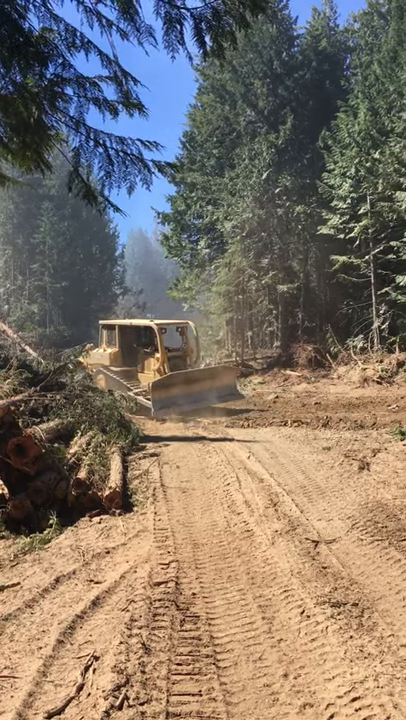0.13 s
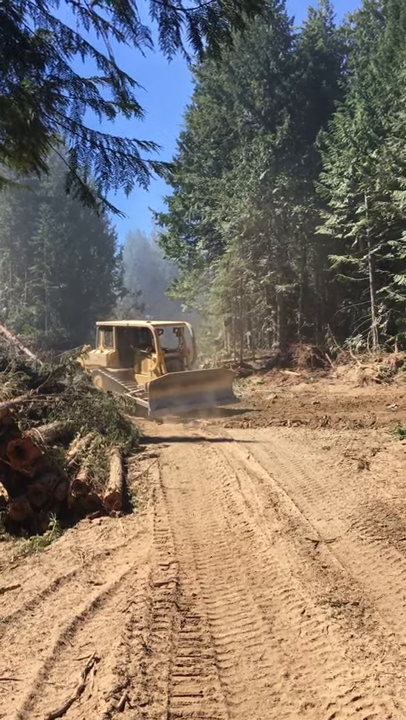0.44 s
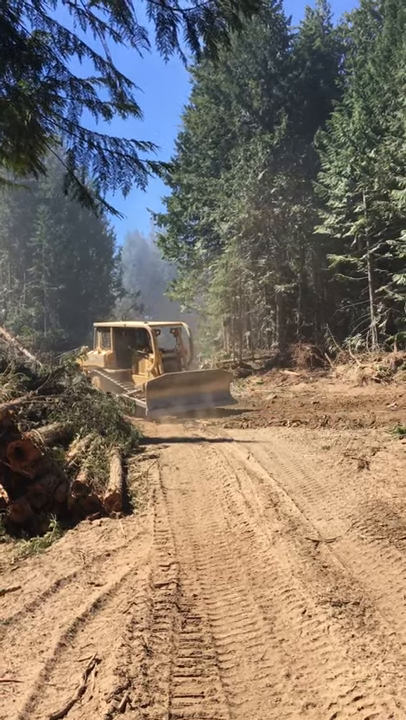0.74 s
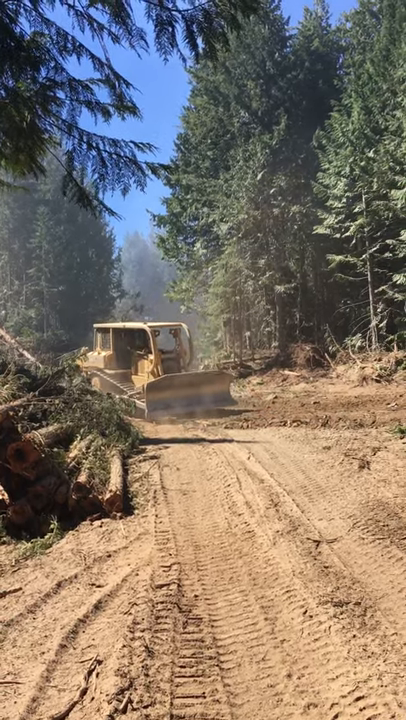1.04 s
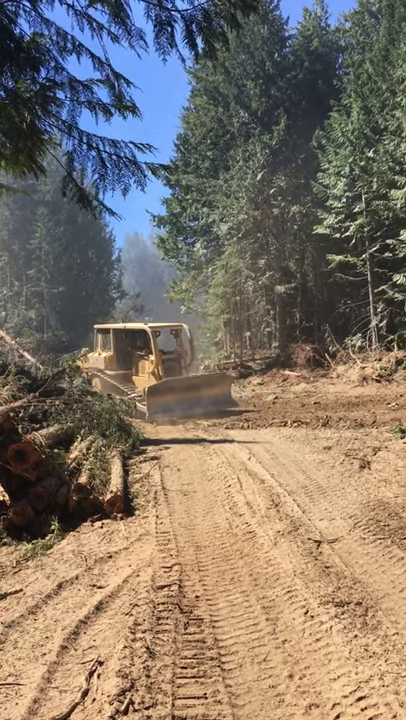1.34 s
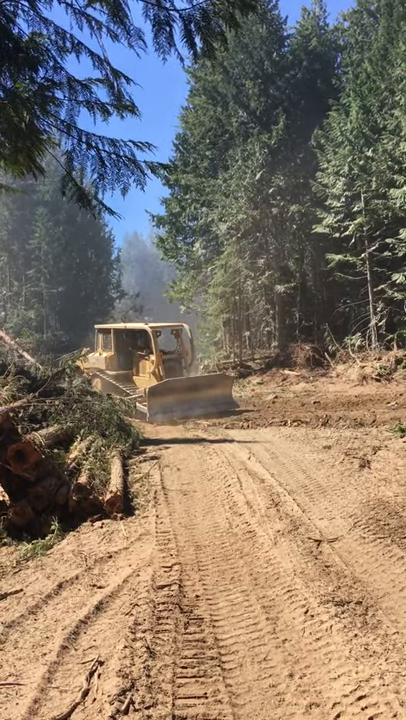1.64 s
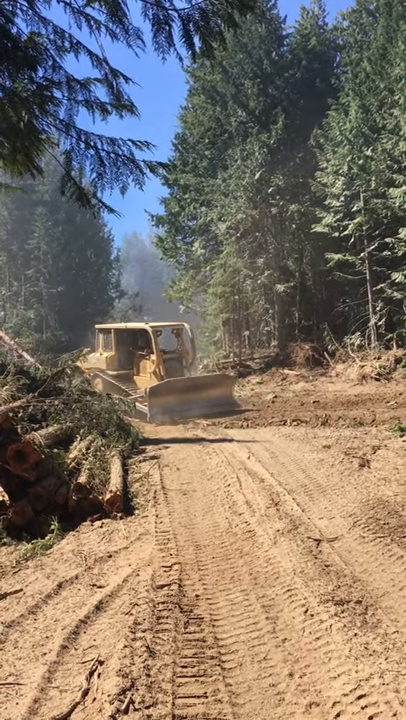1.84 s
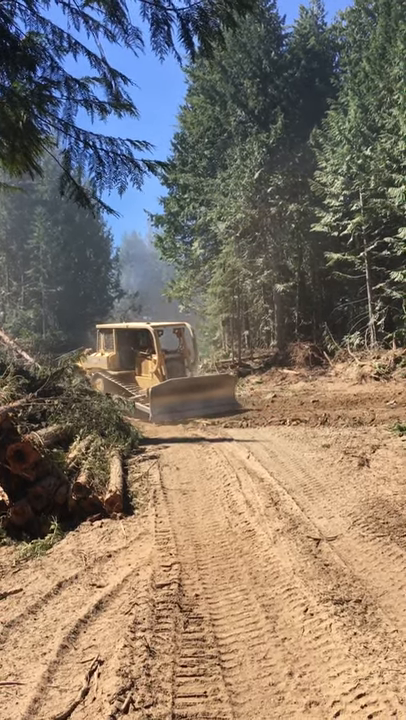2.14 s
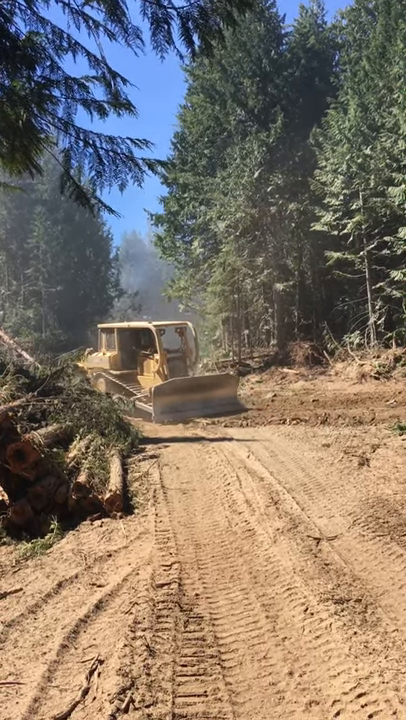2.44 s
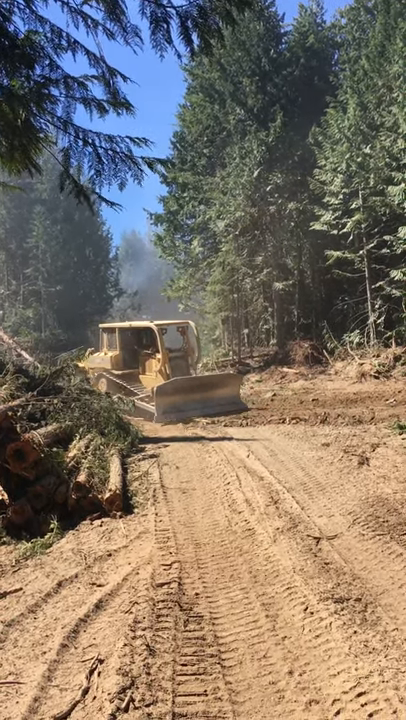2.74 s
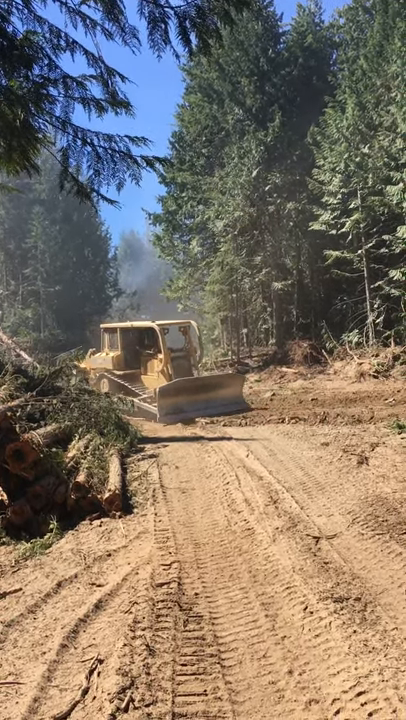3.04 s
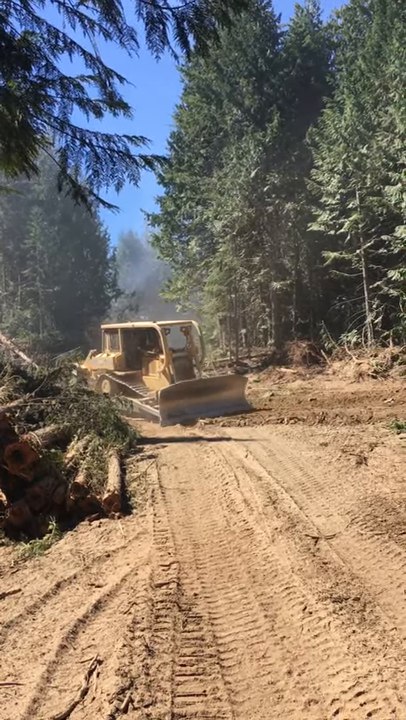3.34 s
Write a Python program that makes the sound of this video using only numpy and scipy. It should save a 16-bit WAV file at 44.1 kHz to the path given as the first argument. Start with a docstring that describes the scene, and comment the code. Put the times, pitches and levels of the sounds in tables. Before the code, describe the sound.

A bulldozer's deep diesel rumble sags in pitch, then revs steadily upward, over a second idling diesel drone. Tracks squeal and scrape mid-way, steel frame knocks follow; open forest clearing, phone microphone at some distance.

```python
"""Bulldozer on a forest track

A tracked diesel slows, then revs up: firing tones, a gas puff per firing through stack resonances, and
block clatter, as sums of sines and filtered noise. Wavering tones make turbo whistle, gear whine and pin squeals.
Tracks scrape as gated grit; steel knocks ring frame modes. Trunks echo these sharp track and frame sounds.
A second diesel idles steadily on its own multiples over booming hull resonances and a broad roar."""
import sys
import numpy as np
from scipy import signal
from scipy.fft import rfft, irfft
from scipy.io import wavfile
from scipy.ndimage import uniform_filter1d

SR = 44100
rng = np.random.default_rng(int(sys.argv[2]) if len(sys.argv) > 2 else 0)


def makeup_ratio(level_db):
    """Linear amplitude ratio for a level in decibels (20 dB per factor of ten)."""
    decades = np.asarray(level_db, float) / 20
    return 10 ** decades


def wrap_up_sound(samples):
    """Save the sound to the file named by the first command line argument, as 16-bit audio."""
    columns = np.atleast_2d(samples).T
    # keep every value between -1 and 1, then stretch to whole-number steps
    tamed = np.clip(columns, -1, 1)
    steps = np.round(tamed * 32767).astype(np.int16)
    wavfile.write(sys.argv[1], SR, steps)


N = 154350
T = np.arange(N) / SR

# dozer engine speed: time_s, firing_hz
REVS = [(0.0, 59.17), (0.21, 57.31), (0.41, 54.73), (0.62, 52.49), (0.82, 51.94), (1.03, 51.93),
        (1.23, 50.5), (1.44, 47.15), (1.65, 43.41), (1.85, 42.84), (2.06, 47.69), (2.26, 52.13),
        (2.47, 55.45), (2.68, 59.15), (2.88, 64.24), (3.09, 65.75), (3.29, 69.92), (3.5, 73.69)]
# dozer firing tone: time_s, level_db
TONE = [(0.0, -27), (0.41, -18.5), (0.82, -17.5), (1.23, -25.5), (1.65, -16.5), (2.06, -21.0), (2.47, -20),
        (2.88, -25), (3.29, -30), (3.5, -40.5)]
# dozer tone partials: firing_multiple, relative_db
DOZER_ORDERS = [(1, 0), (2, -12.5)]
# engine load: time_s, puff_db, clatter_db
BARK = [(0, -42.5, -35.5), (1.1, -49.5, -39), (1.8, -44, -36), (2.2, -35, -36), (2.45, -37, -33),
        (2.7, -43, -35.5), (3.08, -41, -33), (3.5, -43.5, -36)]
# exhaust stack resonances: centre_hz, width_hz, relative_db
STACK_MODES = [(1155, 120, 1.5), (1555, 180, 4)]
# engine block resonances: centre_hz, width_hz, relative_db
BLOCK_MODES = [(979, 146, -4), (1152, 66, -0.5), (1294, 154, -1.5), (1520, 128, -1), (1694, 77, -3.5),
               (1906, 48, -6.5), (2088, 52, -7), (2268, 40, -7.5), (2728, 29, -11.5), (3250, 380, -5)]
# turbo whistle: time_s, pitch_hz, level_db
TURBO = [(0, 7130, -51), (.25, 6850, -49), (.92, 6110, -55.5), (1.15, 5750, -66), (1.5, 5300, -52.5),
         (2.55, 5350, -48.5), (2.85, 5590, -59), (3.1, 6057, -49.5), (3.5, 6450, -60)]
# gear whine: time_s, pitch_hz, level_db
GEAR = [(2.55, 1323, -72), (2.7, 1360, -37.5), (2.95, 1450, -41), (3.15, 1520, -38), (3.33, 1535, -47),
        (3.45, 1606, -37.5)]
# track pin squeals: start_s, hold_s, pitch_hz, level_db
PIN_SQUEALS = [(0.445, .14, 8000, -55), (1.669, 0.063, 7060, -35.5), (1.666, 0.2, 3600, -41),
               (1.926, 0.066, 8331, -47.5), (2.001, 0.045, 8451, -33), (2.105, 0.037, 8480, -43),
               (2.141, 0.05, 7940, -32.5), (2.021, 0.19, 3620, -42.5), (2.311, .289, 8231, -54.5),
               (2.611, 0.073, 8251, -42), (2.601, 0.08, 11000, -49), (2.831, .19, 6361, -53),
               (2.6, .23, 6351, -54)]
# dry scrapes of steel on steel: start_s, hold_s, level_db
SCRAPES = [(1.66, 0.071, -41.5), (1.777, 0.019, -40.5), (1.805, 0.02, -33.5), (1.921, 0.015, -36.5),
           (2.001, 0.18, -35), (2.244, .015, -45.5), (2.593, 0.084, -42)]
# pin resonances in the scrapes: centre_hz, width_hz, relative_db
PIN_MODES = [(3230, 1600, 13.5), (6000, 2000, 3), (8380, 850, 9.5), (11900, 1200, 2.5), (14800, 1500, -1)]
# knocks of the steel frame: time_s, level_db, brightest_hz
KNOCKS = [(0.224, -24, 520), (2.405, -27, 1750), (2.425, -23, 1600), (3.018, -21.5, 1550),
          (3.042, -22.5, 2090), (3.055, -24, 2970), (3.07, -23.5, 1180)]
# frame modes: nominal_hz, t60_s
FRAME_MODES = [(520, 0.045), (1170, 0.063), (1570, .06), (1760, 0.046), (2090, 0.11)]
# idler tone partials: firing_multiple, level_db
IDLER_ORDERS = [(1, -25.5), (2, -22), (3, -39.5), (4, -41.5)]
# hull resonances: centre_hz, width_hz, level_db
HULL_MODES = [(72, 20.4, -25.5), (103, 22, -29), (190.1, 26.6, -34), (272.5, 34.7, -36.5), (348, 57.3, -37),
              (501, 84, -41.5), (658, 75, -44.5)]
# roar spectrum: frequency_hz, relative_density_db
ROAR_COLOUR = [(100, -8.5), (155, -29.5), (300, -13), (600, -22.5), (1500, -24), (3200, -24.5), (4300, -29),
               (6600, -35), (10000, -42), (15500, -48.5)]

DOZER_PHASE_ZERO_S = .0151
SILENCER_LAG_S = .021  # tone leaves the silencer later than the puffs
PUFF_START_CYCLES, PUFF_DECAY_CYCLES, PUFF_SCATTER_DB = 1.264, 0.23, 3.5
BLOW_DB = -1  # sharp puff front, re gas noise
TURBO_POLE_WIDTH_HZ, TURBO_PULSING = 130, .35
TURBO_FLUTTER_HZ = 260  # at the strongest puff level
GEAR_POLE_WIDTH_HZ = 30
SQUEAL_POLE_WIDTH_HZ, SQUEAL_OCTAVE_DB, SQUEAL_FLUTTER_DB = 80, -19, 2.
EDGE_S, RELEASE_S = .005, .006
SPARKLE_DB = -6.5  # thin pin modes, re grit
KNOCK_OCTAVES = .3  # modes this far from the brightest pitch lose 8.4 dB
CRUNCH_DB, CRUNCH_DECAY_S = -9, .025
TREES_T60_S, TREES_DELAY_S, TREES_DB = 0.6, .012, -17
IDLER_HZ, IDLER_PHASE_ZERO_S = 44.26, .0048
ROAR_DB, ROAR_DB_PER_HZ = -36.5, 0.2068  # level at mean firing rate; rise with firing rate
TOP_HZ = 15720


def curve(table, col=1):
    """A table column joined by straight lines in time."""
    return np.interp(T, [row[0] for row in table], [row[col] for row in table])


def unit(x):
    """Scale to rms 1."""
    return x / np.sqrt(np.mean(x ** 2))


def walk(rate_hz):
    """Random levels held 1 / rate_hz and smoothed by two moving averages."""
    hold = int(SR / rate_hz)
    steps = np.repeat(rng.standard_normal(N // hold + 1), hold)
    return 1.58 * uniform_filter1d(uniform_filter1d(steps, hold), hold)[:N]


def ring(x, modes):
    """Sum of twice-applied resonances in alternating sign, each at its own rms level."""
    out = 0
    for k, (hz, width_hz, db) in enumerate(modes):
        b, a = signal.iirpeak(hz, hz / width_hz / 1.55, SR)  # 1.55: two passes narrow the peak
        mode = signal.lfilter(b, a, signal.lfilter(b, a, x))
        out = out + (-1) ** k * makeup_ratio(db) * unit(mode)
    return out


def waver(hz, pole_width_hz, steady):
    """Tone modulated by twice-low-passed complex noise to a narrow band; steady weights the clean tone."""
    pole = np.exp(-np.pi * pole_width_hz / SR)
    z = signal.lfilter([1], np.convolve([1, -pole], [1, -pole]), rng.standard_normal((2, N)))
    blur = (z[0] + 1j * z[1]) / z.std() / 2 ** .5
    carrier = np.exp(2j * np.pi * np.cumsum(hz + 0 * T) / SR)
    return unit(np.real((steady + (1 - steady) * blur) * carrier))


def gate(start_s, hold_s):
    """Linear start, hold, exponential release."""
    release = np.exp(-np.clip(T - start_s - hold_s, 0, 1) / RELEASE_S)
    return np.clip((T - start_s) / EDGE_S, 0, 1) * release


def firing_tones(cycles, orders, wobble_db):
    """Sines at multiples of the firing rate, each wobbling in level."""
    out = 0
    for multiple, db in orders:
        level = makeup_ratio(db + wobble_db * walk(5.78))
        out = out + level * 2 ** .5 * np.sin(2 * np.pi * multiple * cycles)
    return out


def exhaust_puffs(cycle):
    """Each firing starts a decaying gas pulse and a sharp blow of the same random size."""
    size = makeup_ratio(PUFF_SCATTER_DB * rng.standard_normal(400))[np.floor(cycle).astype(int) + 2]
    puffs = unit(uniform_filter1d(size * np.exp(-(cycle % 1) / PUFF_DECAY_CYCLES), size=40))
    blows = unit(size * np.diff(np.floor(cycle), prepend=np.floor(cycle[0])))
    return puffs, blows


def stack_bark(puffs, blows):
    """Puffed gas noise and blows excite the stack resonances."""
    gas = puffs * rng.standard_normal(N)
    return makeup_ratio(curve(BARK)) * unit(ring(gas + makeup_ratio(BLOW_DB) * blows, STACK_MODES))


def block_clatter():
    """Steady noise excites the engine block resonances."""
    level = makeup_ratio(curve(BARK, col=2) + 0.45 * walk(13))
    return level * unit(ring(rng.standard_normal(N), BLOCK_MODES))


def turbo_whistle(puffs):
    """Narrow-band whistle, fluttering in pitch with load and pulsed by the puffs."""
    load = makeup_ratio(curve(BARK))
    hz = curve(TURBO) + TURBO_FLUTTER_HZ * load / load.max() * walk(400)
    level = makeup_ratio(curve(TURBO, col=2) + 2.5 * walk(10))
    return level * waver(hz, TURBO_POLE_WIDTH_HZ, 0.) * unit(1 + TURBO_PULSING * puffs)


def gear_whine():
    """Partly steady tone following the tabled gear pitch."""
    return makeup_ratio(curve(GEAR, col=2)) * waver(curve(GEAR), GEAR_POLE_WIDTH_HZ, 0.38)


def dozer():
    """Firing phase, the integral of firing rate, drives tone and puffs; clatter, turbo and gear add."""
    hz = curve(REVS)
    cycles = np.cumsum(hz) / SR - hz[0] * DOZER_PHASE_ZERO_S
    puffs, blows = exhaust_puffs(cycles + SILENCER_LAG_S * hz - PUFF_START_CYCLES)
    tone = makeup_ratio(curve(TONE)) * firing_tones(cycles, DOZER_ORDERS, 0.32)
    return tone + stack_bark(puffs, blows) + block_clatter() + turbo_whistle(puffs) + gear_whine()


def pin_squeals():
    """Pins squeal on single modes, with an octave where it fits below TOP_HZ."""
    out = 0
    for start_s, hold_s, hz, db in PIN_SQUEALS:
        steady = .75 if db > -40 else .4  # faint squeals are rougher
        tone = waver(hz, SQUEAL_POLE_WIDTH_HZ, steady)
        if 2 * hz < TOP_HZ:
            tone = tone + makeup_ratio(SQUEAL_OCTAVE_DB) * waver(2 * hz, 2 * SQUEAL_POLE_WIDTH_HZ, steady)
        out = out + makeup_ratio(db + SQUEAL_FLUTTER_DB * walk(70)) * gate(start_s, hold_s) * tone
    return out


def scrapes():
    """Gated bursts of grit through pin resonances, with thin modes flaring at random."""
    grit = unit(ring(makeup_ratio(1.8 * walk(200)) * rng.standard_normal(N), PIN_MODES))
    flares = 0
    for hz in rng.uniform(7600., 13200., size=48):
        flares = flares + makeup_ratio(6. * np.clip(walk(50), -2, 1.5)) * waver(hz, 130., 0.)
    gates = sum(makeup_ratio(db) * gate(start_s, hold_s) for start_s, hold_s, db in SCRAPES)
    return (grit + makeup_ratio(SPARKLE_DB) * unit(flares)) * gates


def knocks():
    """Each knock rings the frame modes nearest its brightest pitch and crunches briefly."""
    out = 0
    for time_s, db, brightest_hz in KNOCKS:
        t = np.clip(T - time_s, 0, 9)
        crunch = ring(rng.standard_normal(N), [(brightest_hz, 0.73 * brightest_hz, db + CRUNCH_DB)])
        out = out + (t > 0) * np.exp(-t / CRUNCH_DECAY_S) * crunch
        for hz, t60_s in FRAME_MODES:
            level_z, pitch_z = rng.standard_normal(2)
            distance = np.log2(hz / brightest_hz) / KNOCK_OCTAVES
            level = makeup_ratio(db + 1.6 * level_z - 8.4 * distance ** 2)
            envelope = makeup_ratio(-60 * t / t60_s) * (1 - np.exp(-t / 0.00084))
            out = out + level * np.sin(2 * np.pi * hz * (1 + 0.011 * pitch_z) * t) * envelope
    return out


def idler():
    """Second diesel: multiples of a constant firing rate."""
    return firing_tones(IDLER_HZ * (T - IDLER_PHASE_ZERO_S), IDLER_ORDERS, 0.94)


def hull_boom():
    """Noise-driven hull resonances, each swelling on its own."""
    return sum(makeup_ratio(1.67 * walk(4.91)) * ring(rng.standard_normal(N), [mode]) for mode in HULL_MODES)


def roar():
    """Broad fan and track noise in separately wavering octaves, louder at higher firing rate."""
    f = np.maximum(np.arange(N // 2 + 1) * SR / N, 1)
    hz, db = np.transpose(ROAR_COLOUR)
    spectrum = rfft(rng.standard_normal(N)) * makeup_ratio(np.interp(np.log(f), np.log(hz), db))
    out = 0
    for centre_hz in 125 * 2. ** np.arange(8):
        band = np.cos(np.pi / 2 * np.clip(np.log2(f / centre_hz), -1, 1)) ** 2
        out = out + makeup_ratio(0.92 * walk(9.24)) * irfft(spectrum * band, N)
    faster_hz = curve(REVS) - np.mean(curve(REVS))
    return makeup_ratio(ROAR_DB + ROAR_DB_PER_HZ * faster_hz) * unit(out)


def tree_echo(sharp):
    """Trunks scatter sound into a delayed, decaying noise tail of unit energy."""
    t = T[:SR // 2]
    tail = rng.standard_normal(len(t)) * makeup_ratio(-60 * t / TREES_T60_S) * (t > TREES_DELAY_S)
    return makeup_ratio(TREES_DB) * signal.fftconvolve(sharp, tail / np.sqrt(np.sum(tail ** 2)))[:N]


def scene():
    """Machines plus the trunk echo of the sharp sounds, one channel."""
    sharp = pin_squeals() + scrapes() + knocks()
    return (dozer() + sharp + idler() + hull_boom() + roar() + tree_echo(sharp))[None]


def top_cut(x):
    """Nothing passes above the cut-off."""
    return signal.sosfilt(signal.butter(12, 16670, fs=SR, output="sos"), x)


def record(dry):
    """The phone cuts the top with a steep elliptic low-pass."""
    low_pass = signal.ellip(10, .2, 70, TOP_HZ, fs=SR, output="sos")
    mix = signal.sosfilt(low_pass, dry)
    return top_cut(mix)


dry = scene()
out = record(dry)
wrap_up_sound(out)
```